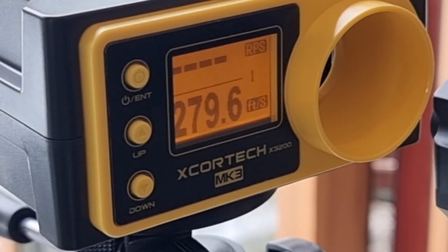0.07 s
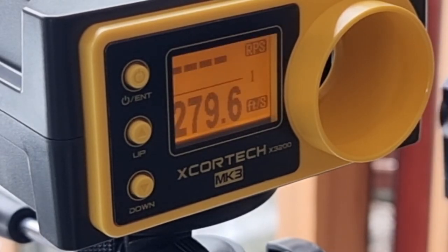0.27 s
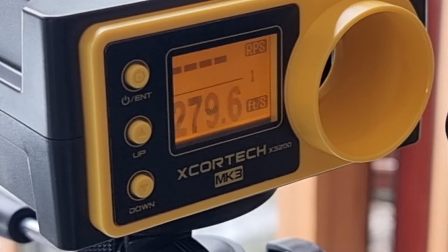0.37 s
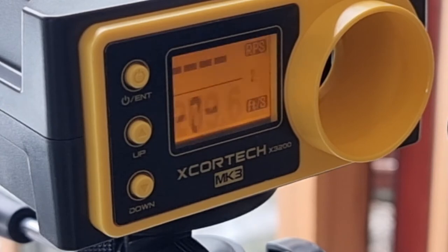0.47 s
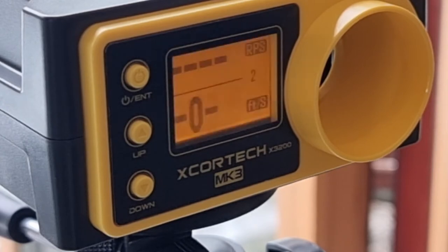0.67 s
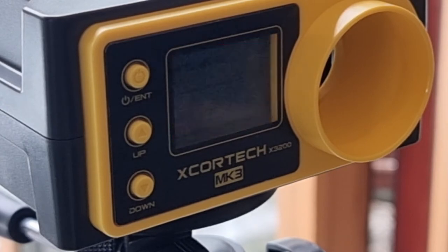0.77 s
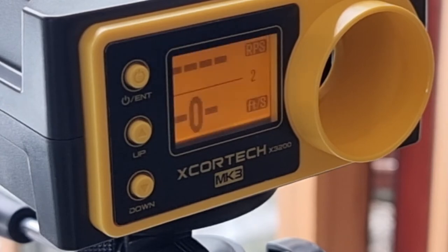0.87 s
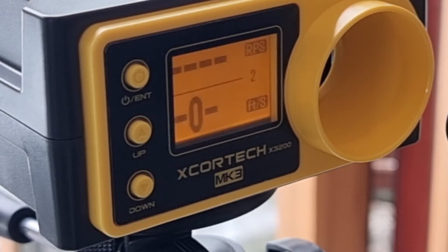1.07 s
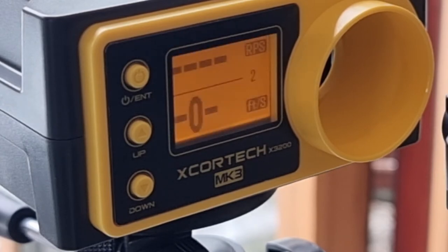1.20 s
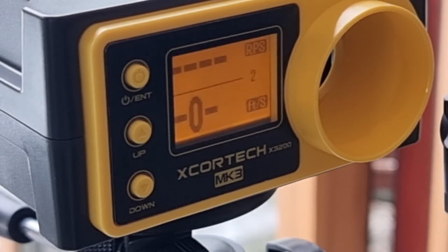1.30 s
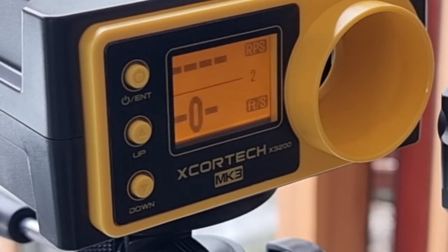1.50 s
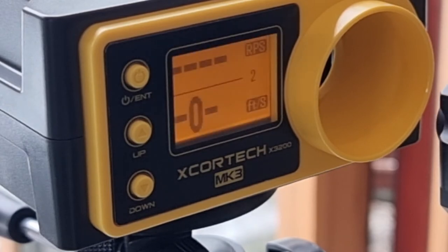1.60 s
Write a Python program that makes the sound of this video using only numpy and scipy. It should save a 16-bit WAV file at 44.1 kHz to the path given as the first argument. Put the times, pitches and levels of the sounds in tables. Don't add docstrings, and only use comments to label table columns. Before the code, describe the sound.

A gas-powered pistol fires once close by indoors, a sharp clipped crack, then a metallic click

```python
import sys
import numpy as np
from scipy import signal
from scipy.fft import rfft, irfft
from scipy.io import wavfile
from scipy.ndimage import uniform_filter1d

SR = 44100
rng = np.random.default_rng(int(sys.argv[2]) if len(sys.argv) > 2 else 0)


def store_pcm(level_fs):
    pcm = np.round(np.clip(level_fs, -1, 1) * 32767).astype(np.int16)
    wavfile.write(sys.argv[1], SR, np.atleast_2d(pcm).T)


def nominal_scale(level):
    x = np.asarray(level, float) / 20
    return 10 ** x


N = 72765
BLAST_S = .2165

# [t/s, level/dB, extra weight of the lowest body mode/dB]
CLACKS = [
    (0.2283, 8.5, -2),
    (.23785, 11, 3),
    (0.276, 8.5, 4.5),
    (.38275, -4, -7),
]


def level(x):
    return x / np.sqrt(np.mean(x ** 2))


def band(hz, width):
    low = hz / (1 + width / 2)
    high = min(hz * (1 + width / 2), .47 * SR)
    sos = signal.butter(2, [low, high], "band", fs=SR, output="sos")
    return level(signal.sosfilt(sos, rng.standard_normal(N)))


def coloured(spectrum):
    hz, db = np.array(spectrum, float).T
    f = np.maximum(np.arange(N // 2 + 1) * SR / N, 1)
    gain = nominal_scale(np.interp(np.log(f), np.log(hz), db))
    return level(irfft(rfft(rng.standard_normal(N)) * gain, N))


def fade(start, t60, rise=.0001):
    u = np.maximum(np.arange(N) / SR - start, 0)
    attack = 1 - np.exp(-u / max(rise, 1e-5))
    decay = np.exp(-np.log(1000) * u / max(t60, 1e-3))
    return attack * decay


def ring(start, hz, t60):
    return fade(start, t60) * np.sin(2 * np.pi * hz * (np.arange(N) / SR - start))


def walk(rate):
    k = int(SR / rate)
    return level(uniform_filter1d(uniform_filter1d(rng.standard_normal(N), k), k))


def air():
    # [f/Hz, level/dB per Hz]
    air_spectrum = [(25, -7.5), (59, -2), (100, -8), (400, -11), (830, -5), (2500, -20), (6300, -38.5),
                    (16000, -45)]
    # [t/s, level/dB]
    air_level = [(0, -54), (.2, -50), (.35, -57.5), (.8, -58.5), (1.4, -59), (1.65, -53.5)]
    rumble_hz, rumble_db, rumble_end_s = 80, -60, .21
    t = np.arange(N) / SR
    tone_db = np.interp(t, *np.array(air_level).T) + 0.4 * walk(12)
    tone = coloured(air_spectrum) * nominal_scale(tone_db)
    rumble = nominal_scale(rumble_db + walk(6.8)) * band(rumble_hz, 1.1) * (t < rumble_end_s)
    return tone + rumble


def blast():
    # [t/s, f/Hz, level/dB, t60/s]
    barrel_rings = [
        (.2166, 930, -4, .02),
        (.21825, 640, 8, .0095),
        (.2289, 790, 16, .0095),
    ]
    valve = nominal_scale(-13) * fade(.2128, .08, rise=.002) * band(4200, 2.2)
    gas = nominal_scale(-6) * fade(BLAST_S, .07, rise=.00027) * band(4050, 1.2)
    barrel = sum(nominal_scale(db) * ring(s, hz, t60) for s, hz, db, t60 in barrel_rings)
    return valve + gas + barrel


def tail():
    # [f/Hz, level/dB per Hz]
    wash_spectrum = [(40, -14), (160, -3.5), (390, -1.5), (900, -1.5), (2900, -14), (5400, -10.5),
                     (7500, -23.5), (16000, -38.5)]
    build_s = .02
    wash = coloured(wash_spectrum) * nominal_scale(walk(60))
    low = signal.sosfilt(signal.butter(2, 6000, fs=SR, output="sos"), wash)
    high = wash - low
    late = low * fade(BLAST_S, .4, build_s) + high * fade(BLAST_S, .36, build_s)
    early = nominal_scale(-2) * coloured(wash_spectrum) * fade(BLAST_S, .24, build_s)
    boom = nominal_scale(-13) * ring(BLAST_S, 52.1, .35)
    hum = nominal_scale(-13.5) * ring(BLAST_S, 385, .35)
    return boom + hum + early + nominal_scale(-9) * late


def slide():
    # [f/Hz, level/dB, t60/s]
    body_modes = [(1363, -3.5, .012), (3080, -9.5, 0.0034), (4030, -3, .0045), (4800, -8, .004),
                  (7460, -11, 0.003), (9750, -4.5, .006), (11570, -10.5, .004)]
    # [f/Hz, level/dB, t60/s]
    spring_rings = [(3710, -41, .12), (10830, -58, .12), (13260, -51, .1), (13920, -60, .1)]
    crack_db, crack_t60_s = -17.5, .02
    out = sum(nominal_scale(db) * ring(CLACKS[-1][0], hz, t60) for hz, db, t60 in spring_rings)
    for s, db, low_db in CLACKS:
        body = 0
        for k, (hz, mode_db, t60) in enumerate(body_modes):
            body = body + nominal_scale(mode_db + low_db * (k == 0)) * ring(s, hz, t60)
        crack = nominal_scale(crack_db) * fade(s, crack_t60_s) * band(5000, 2.5)
        out = out + nominal_scale(db) * (body + crack)
    return out


def pellet():
    # [t/s, level/dB, f/Hz, t60/s]
    bounces = [(.487, -67, 13000, .04), (.488, -62, 10000, .04), (.489, -55, 6900, .03),
               (.502, -62, 8200, .04), (0.504, -64.5, 10500, 0.047), (.760, -60, 5300, .02),
               (.779, -61, 4300, 0.044), (.785, -59, 4370, 0.019), (.779, -73, 9000, .04),
               (.785, -68, 6000, 0.027), (0.781, -57, 295, .08), (0.795, -64.5, 4100, 0.056),
               (.806, -68, 4100, 0.075), (1.573, -69, 4800, .02)]
    return sum(nominal_scale(db) * fade(s, t60, rise=.00072) * band(hz, .16) for s, db, hz, t60 in bounces)


def whistle():
    start_s, length_s = .685, .095
    start_hz, rise_hz_per_s = 9400, 3000
    u = np.clip(np.arange(N) / SR - start_s, 0, length_s)
    tone = np.sin(2 * np.pi * (start_hz * u + rise_hz_per_s * u ** 2 / 2))
    swell = np.sqrt(np.abs(np.sin(np.pi * u / length_s)))
    return nominal_scale(-90 + 2 * walk(60)) * swell * tone


def scene():
    return (air() + blast() + tail() + slide() + pellet() + whistle())[None]


def top_cut(x):
    return signal.sosfilt(signal.butter(12, 16850, fs=SR, output="sos"), x)


def record(dry):
    # [t/s, pressure]
    stage_needs = [(.2203, -0.7018), (.2213, 0.11), (.228, 0.2), (.2293, 1.9), (.2297, 2), (.28, 2),
                   (0.342, 1.5)]
    rail_start, rail_end, ceiling = -.7, -.035, .74
    rail_holds_s, wake_s = .232, .3418
    t = np.arange(N) / SR
    bled = np.clip((t - rail_holds_s) / (wake_s - rail_holds_s), 0, 1)
    charge = np.cos(np.pi / 2 * bled) ** 2
    jolt = -.1 * fade(CLACKS[2][0], .15, rise=.003)
    rail = rail_end + (rail_start - rail_end) * charge + jolt
    needed = np.interp(t, *np.array(stage_needs).T)
    blocked = np.clip(dry - needed + rail, rail, ceiling)
    hiss = nominal_scale(-84) * rng.standard_normal(N)
    x = np.where(t < wake_s, blocked, dry) + hiss
    x = signal.sosfilt(signal.butter(4, 57, "high", fs=SR, output="sos"), x)
    x = np.clip(x, -.9, .88)
    x = signal.sosfiltfilt(signal.butter(10, 15500, fs=SR, output="sos"), x)
    return top_cut(x)


dry = scene()
out = record(dry)
store_pcm(out)
```